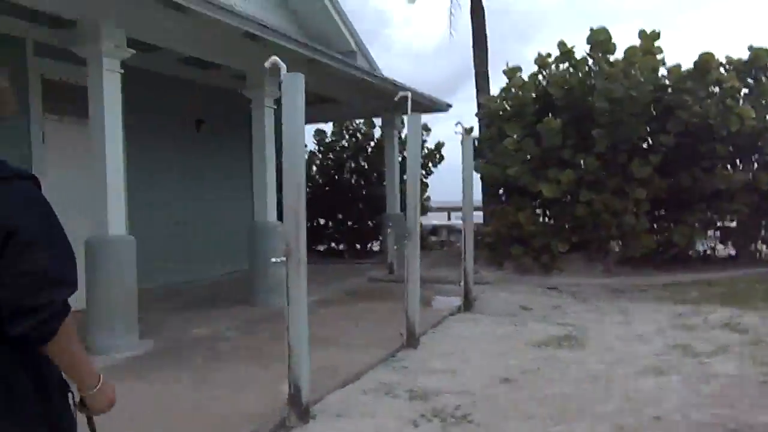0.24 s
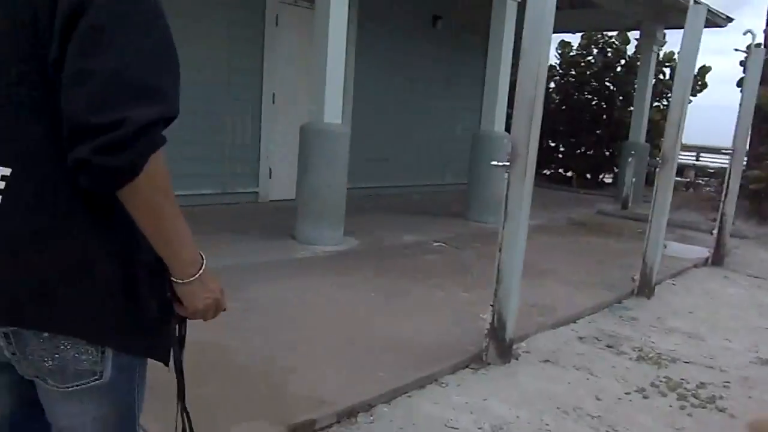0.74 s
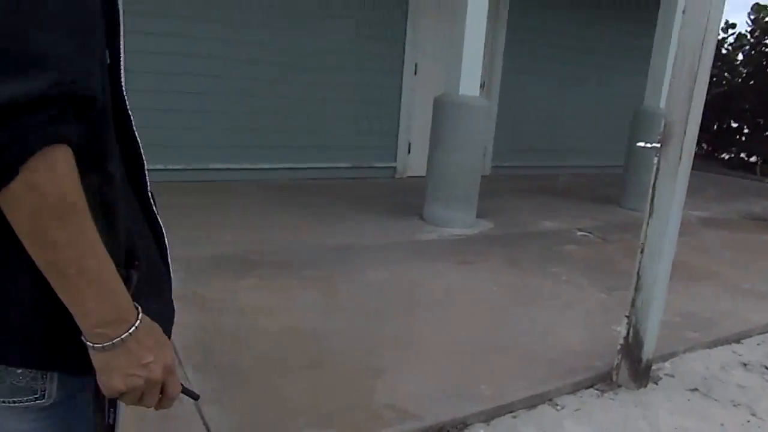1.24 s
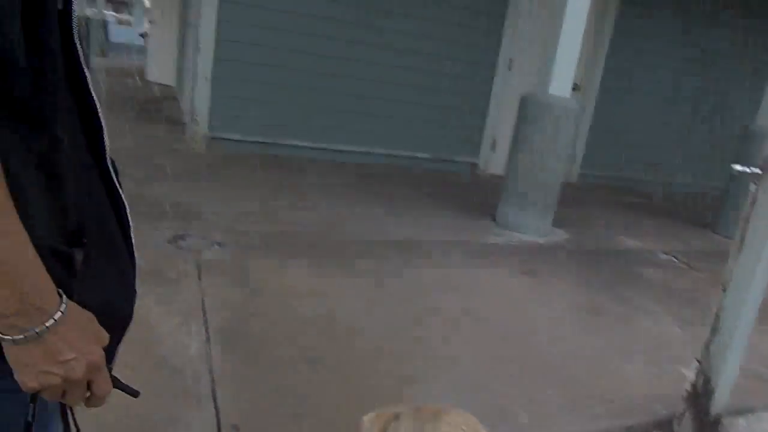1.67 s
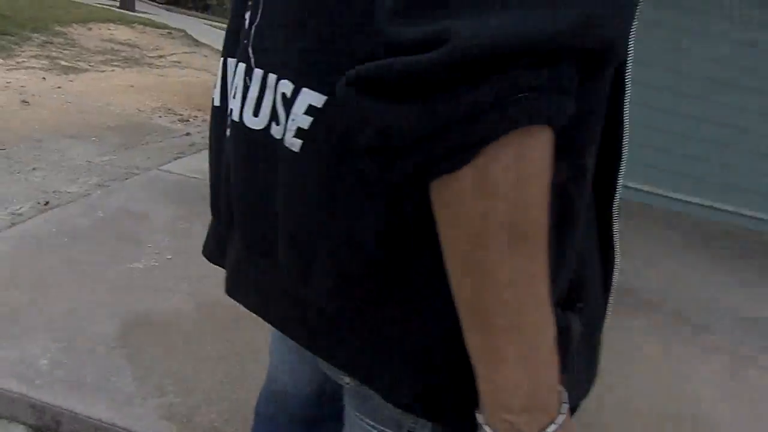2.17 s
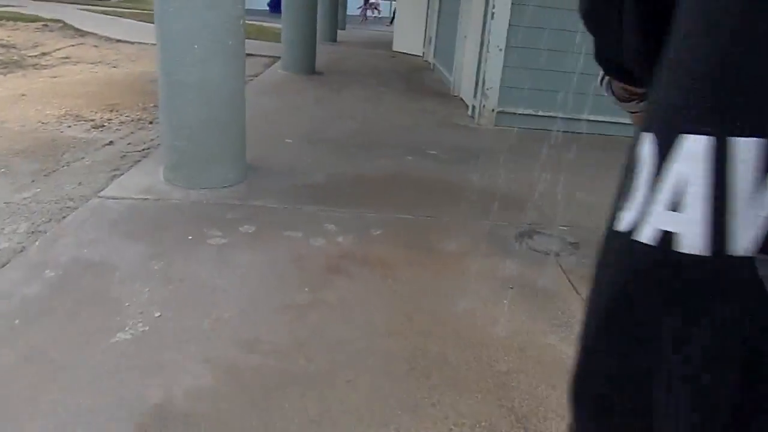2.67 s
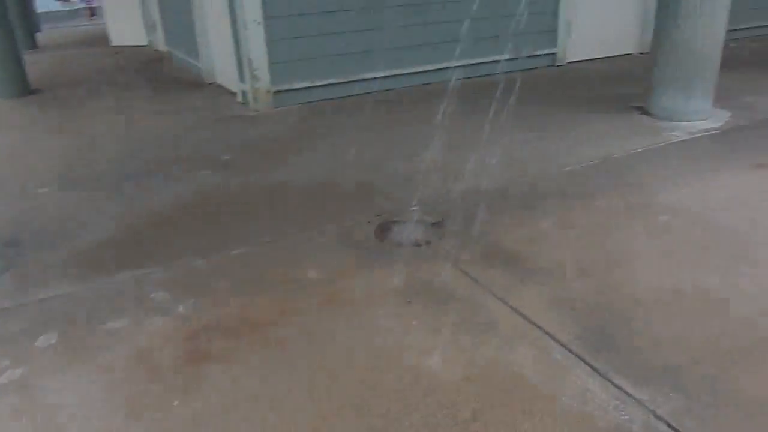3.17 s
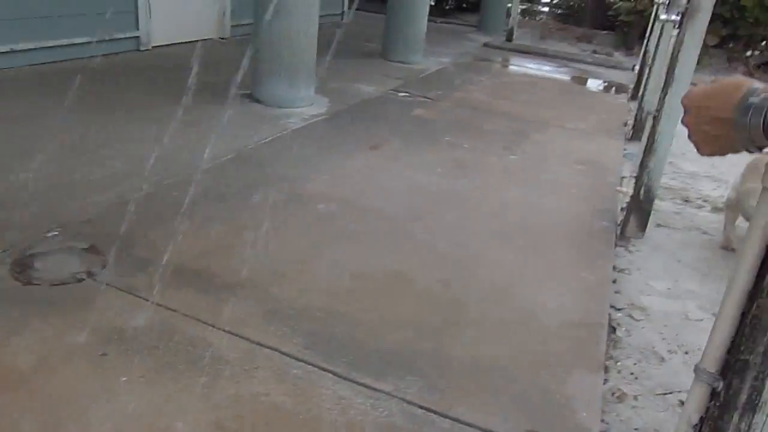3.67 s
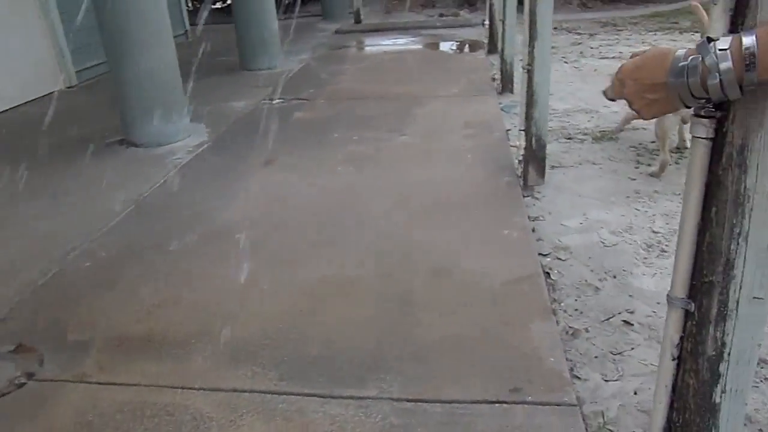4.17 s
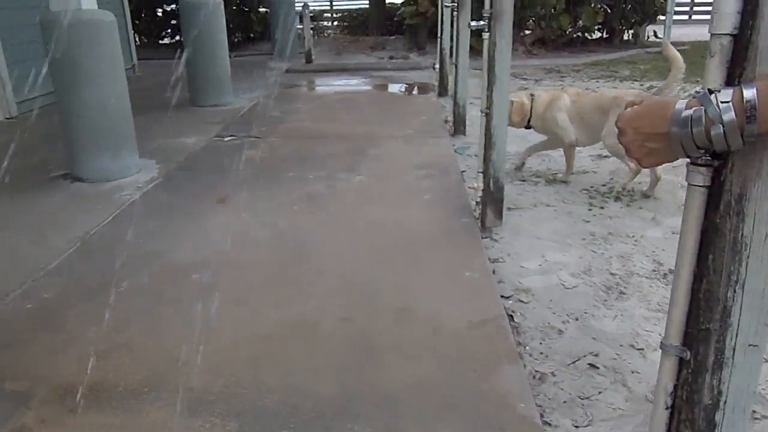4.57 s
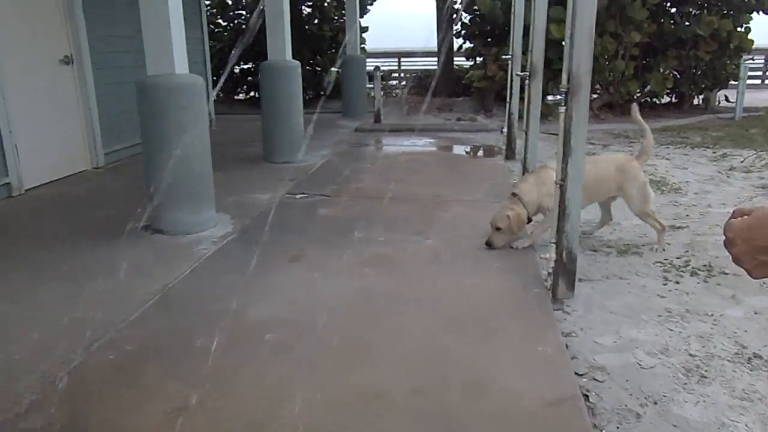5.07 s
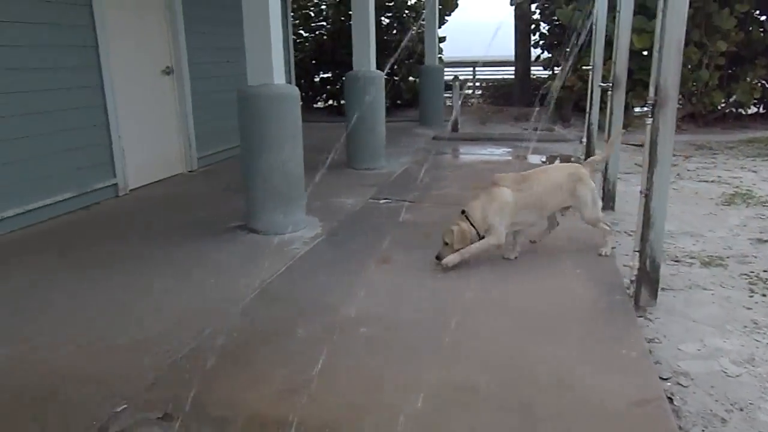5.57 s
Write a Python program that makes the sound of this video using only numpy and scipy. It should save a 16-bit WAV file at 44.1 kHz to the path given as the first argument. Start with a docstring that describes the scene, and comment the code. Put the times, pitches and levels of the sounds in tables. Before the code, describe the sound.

Outdoors by the sea, low wind and surf rumble over soft thumps and sandy scuffs, with a faint far hoot and squeak. A valve clicks and a shower spurts, then runs, hissing and cracking on concrete. The carried microphone moves under a roof, the wind dulls, the spray sags near four seconds and is pressed back on.

```python
"""A beach pavilion by the sea, heard from a camera microphone carried past an outdoor shower.
At first wind and surf rumble, feet thump and scuff over sand, a far hoot and a squeak pass; then the push
valve clicks and spurts, is pressed again and runs, its drops cracking on wet concrete over a mist of droplets.
From 2 s the microphone moves in under the roof and the wind fades and dulls in the lee of the building.
Near 3.9 s a hollow blip sounds and the spray sags, until a last press brings it back; hard ticks run throughout."""
import sys
import numpy as np
from scipy import signal
from scipy.fft import rfft, irfft, next_fast_len
from scipy.io import wavfile
from scipy.ndimage import uniform_filter1d, map_coordinates

SR = 44100
rng = np.random.default_rng(int(sys.argv[2]) if len(sys.argv) > 2 else 0)


def master_out(mix):
    """Clip the mix to full scale and print it as 16-bit PCM to the path in sys.argv[1]."""
    frames = np.transpose(np.atleast_2d(mix))
    ceiling = np.clip(frames, -1, 1)
    pcm = np.round(ceiling * 32767).astype(np.int16)
    wavfile.write(sys.argv[1], SR, pcm)


N = 256662
TIME = np.arange(N) / SR  # [s]


def amp(db):
    """Decibels to gain."""
    return 10 ** (np.asarray(db) / 20)


def unit(x):
    """Scale to rms 1."""
    return x / np.sqrt(np.mean(x ** 2) + 1e-20)


def curves(rows):
    """One value per sample for each column after the time."""
    times, *columns = np.transpose(rows)
    return [np.interp(TIME, times, column) for column in columns]


def wobble(rate):
    """A smooth random curve, rate knots a second."""
    knots = rng.standard_normal(int(N * rate / SR) + 4)
    return map_coordinates(knots, [TIME * rate])


def filtered(x, response):
    """x times a response of frequency, padded so that the end does not wrap to the start."""
    size = next_fast_len(N + SR // 4)
    spectrum = rfft(x, size) * response(np.fft.rfftfreq(size, 1 / SR))
    return irfft(spectrum, size)[:N]


def coloured(x, spectrum):
    """x shaped by (frequency [Hz], level [dB]) points, joined on a log frequency scale, at rms 1."""
    points_hz, db = np.transpose(spectrum)

    def response(hz):
        return amp(np.interp(np.log(hz + 1), np.log(points_hz + 1), db, left=-120))

    return unit(filtered(x, response))


def noise(spectrum):
    """Fresh noise of the given colour."""
    return coloured(rng.standard_normal(N), spectrum)


def swell(s, length):
    """A bell-shaped envelope around time s, down to exp(-2) one length away."""
    return np.exp(-2 * ((TIME - s) / length) ** 2)


def hump(hz, centre_hz, sharp):
    """A broad resonance, symmetrical in octaves around its centre."""
    return 1 / (1 + (sharp * np.log2((hz + 1) / centre_hz)) ** 2)


def impacts(rate, spread_db, life, clump_db):
    """Random tiny noise bursts at a steady or changing rate, each with its own size, decay and colour."""
    start = np.flatnonzero(rng.random(N) < rate / SR)
    count = len(start)
    age = np.arange(64)  # samples since each impact
    lives = life * np.exp(.5 * rng.standard_normal((count, 1)))
    burst = rng.standard_normal((count, len(age))) * np.exp(-age / SR / lives)
    burst /= np.linalg.norm(burst, axis=1, keepdims=True)
    size = amp(spread_db * np.minimum(rng.standard_normal((count, 1)), 2))  # drops only grow so big
    places = start[:, None] + age
    train = np.bincount(places.ravel(), (size * burst).ravel(), N)[:N]
    return unit(train / np.sqrt(rate) * amp(clump_db * wobble(90)))  # fewer drops are fatter


ENTER_S, ENTER_LENGTH_S = 1.98, 1.0  # when the move in under the roof starts, and how long it takes


def under_roof():
    """0 out on the sand, 1 once the camera is in the pavilion."""
    return np.clip((TIME - ENTER_S) / ENTER_LENGTH_S, 0, 1)


# strength of the wind, dropping in the lee of the building: (time [s], level [dB])
WIND = [(0.0, -34), (0.6, -32.5), (1.05, -35.5), (1.4, -33.5), (1.7, -37.5), (2.7, -39.5), (3.1, -43.5),
        (3.9, -46), (4.8, -46.5), (5.82, -43)]
# colours of the sea air, each brought to rms 1: (frequency [Hz], relative level [dB])
BUFFET = [(12, -34), (20, -8.5), (59, -8), (130, -14.5), (170, -20), (290, -120)]  # low buffeting
ROAR = [(53, -0.5), (90, -1.5), (220, 1.5), (290, -1.5), (422, -3), (520, -7.5), (690, -17.5), (800, -25.5),
        (1040, -24), (1760, -120)]  # wind out on the sand
LEE = [(41, -27), (70, 0.5), (123, -1.5), (146, 0.5), (254, -3), (291, -5.5), (613, -17.5), (741, -16.5),
       (856, -25.5), (1000, -39), (1300, -55), (2200, -120)]  # the same wind in the shelter of the wall
WASH = [(300, -7), (550, 0.5), (800, 3), (1300, -2.5), (2000, -5), (4000, -10), (9000, -16), (14000, -20)]  # surf
ROAR_DB, BUFFET_DB, WASH_DB = 0, -7, -9  # each layer against the wind's mean strength
BUFFET_GROWS, WASH_GROWS = 0.4, 1.23  # dB of swing for each dB of wind


def seaside():
    """One strength drives the buffeting, the roar round the building (duller in its lee) and the wash of surf."""
    strength_db, = curves(WIND)
    swing_db = strength_db - strength_db.mean()
    buffet = amp(BUFFET_DB + BUFFET_GROWS * swing_db + 1.4 * wobble(9)) * noise(BUFFET)
    shelter = under_roof()
    wind = np.sqrt(1 - shelter) * noise(ROAR) + np.sqrt(shelter) * noise(LEE)
    roar = amp(ROAR_DB + swing_db + 0.43 * wobble(8.5)) * wind
    wash = amp(WASH_DB + WASH_GROWS * swing_db + 0.94 * wobble(4.05)) * noise(WASH)
    return amp(strength_db.mean()) * (buffet + roar + wash)


# soft jolts of walking: (time [s], length [s], level [dB], centre [Hz])
THUMPS = [(0.008, 0.03, -25.5, 60), (0.216, 0.081, -29, 67), (0.498, 0.056, -38, 60),
          (0.603, 0.046, -33.5, 70), (2.828, 0.06, -40.5, 159), (3.19, 0.15, -43, 59)]
# scuffs on sand: (time [s], length [s], level [dB], centre [Hz])
SCUFFS = [(0.194, 0.0079, -43, 8500), (0.316, 0.084, -40.5, 1720), (0.376, 0.018, -39, 990),
          (0.38, 0.071, -44, 7840), (0.51, 0.026, -37.5, 7360), (0.599, 0.0061, -37, 2330),
          (0.63, 0.084, -45, 5970), (0.744, 0.0043, -34, 1750), (0.783, 0.037, -36.5, 2000),
          (0.914, 0.011, -35, 3300)]


def steps():
    """Walking jolts the camera in low noise thumps and grinds the sand in swells of tiny grit impacts."""
    out = np.zeros(N)
    for s, length, db, centre_hz in THUMPS:
        jolt = filtered(rng.standard_normal(N), lambda hz: hump(hz, centre_hz, 0.97) / (1 + (hz / 280) ** 4))
        out += amp(db) * swell(s, length) * unit(jolt)
    grit = impacts(rate=6000, spread_db=5, life=.0002, clump_db=1)
    for s, length, db, centre_hz in SCUFFS:
        scuff = filtered(grit, lambda hz: hump(hz, centre_hz, 1.28))
        out += amp(db) * swell(s, length) * unit(scuff)
    return out


# a far hoot, a squeak and the valve singing as it opens: (start [s], attack [s], hold [s], release [s],
# turning pitch [Hz], droop [Hz/s], level [dB], roughness of pitch [0-1])
TONES = [(0.01, 0.11, 0.15, 0.05, 653, -1, -46, 0), (0.53, 0.15, 0.074, 0.13, 1284, 800.5, -38.5, 0.03),
         (1.0, 0.01, 0.14, 0.12, 11300, 4, -44, 0.022)]
FLUTTER_DB = 1.2  # unsteadiness of those tones


def whistle(start, attack, hold, release, top_hz, droop, db, rough):
    """A thin unsteady sine; with a positive droop its pitch climbs during the attack and falls after it."""
    corners = start + np.cumsum([0, attack, hold, release])
    envelope = np.interp(TIME, corners, [0, 1, 1, 0]) ** 2
    hz = top_hz - droop * np.abs(TIME - start - attack)
    phase = 2 * np.pi * np.cumsum(hz * (1 + rough * wobble(250))) / SR
    return envelope * amp(db + FLUTTER_DB * wobble(89.2)) * np.sqrt(2) * np.sin(phase)


BLIP_S, BLIP_LENGTH_S, BLIP_DB, BLIP_HZ = 3.849, 0.019, -47, 1256


def blip():
    """A short hollow note of narrow-band noise, without a clear pitch."""
    tone = filtered(rng.standard_normal(N), lambda hz: 1 / (1 + ((hz - BLIP_HZ) / 110) ** 4))
    return amp(BLIP_DB) * swell(BLIP_S, BLIP_LENGTH_S) * unit(tone)


# hard ticks of grit, valve clicks and fat drops, each starting 1 ms after its time:
# (time [s], crack level [dB], crack centre [Hz], snap rms level [dB], clack rms level [dB])
TICKS = [(0.4107, -11, 6700, -35, -32), (0.4468, -10.5, 10400, -44, -37), (0.4901, -12, 8550, -37, -34.5),
         (0.8797, -2.5, 12100, -24, -35.5), (1.0066, -20, 11000, -54, -37), (1.7875, -9, 9390, -28.5, -40),
         (1.7982, -9, 10400, -34, -30), (2.6948, -11, 11420, -40, -41), (2.7402, -10, 10000, -31, -52),
         (2.8863, -9, 9640, -37, -49), (3.4181, -19, 9110, -36, -32.5), (3.5327, -7, 10180, -48, -49),
         (4.0652, -25, 7710, -41, -55), (4.124, -25, 9720, -41, -53), (4.276, -23.5, 5960, -39, -56),
         (4.32, -16, 9100, -35, -47), (4.343, -16, 10800, -34, -50), (4.5417, -11, 8770, -39, -56),
         (4.8633, -18, 10740, -38, -52), (5.4988, -11.5, 8920, -41, -48)]
SNAP_HZ, CLACK_HZ = 6720, 3350  # typical middle and low ring; each tick strays from them
CRACK_S, SNAP_S, CLACK_S = 0.0001, 0.00024, 0.00016  # from the start of each ring to its fullest


def ticks():
    """Each hard contact rings for a few cycles, snaps and clacks lower down and throws a brief spatter."""
    out = np.zeros(N + SR)
    t = np.arange(SR // 300) / SR

    def ring(hz, life):
        return np.sin(2 * np.pi * hz * t) * t / life * np.exp(1 - t / life)

    for s, db, hz, snap_db, clack_db in TICKS:
        spatter = .17 * rng.standard_normal(len(t)) * np.exp(-t / .001)
        crack = ring(hz, CRACK_S) + spatter
        snap = unit(ring(SNAP_HZ * np.exp(rng.normal(0, .06)), SNAP_S))
        clack = unit(ring(CLACK_HZ * np.exp(rng.normal(0, 0.13)), CLACK_S))
        first = round((s + .001) * SR)
        out[first:][:len(t)] += amp(db) * crack + amp(snap_db) * snap + amp(clack_db) * clack
    return filtered(out[:N], lambda hz: (hz / np.hypot(hz, 1100)) ** 2)  # takes off the lows


# presses of the self-closing valve: (opens [s], depth [0-1], rise time [s], shut [s],
# length of the sag before it shuts [s])
PRESSES = [(0.778, 0.72, 0.095, 1.01, 0.1), (1.003, 0.8, 0.093, 4.32, 0.48), (4.272, 1, 0.028, 7.5, 0.4)]
KICK, LEAK = 0.32, 0.08  # share of flow at the push, share of pressure left when shut
CHOKE_S, CHOKE_DB = 0.02, -9  # the water is pinched off just before each push


def valve():
    """Flow and pressure, 0-1: each press lets a kick of water through, fills up, then sags until it shuts."""
    flow, pressure = np.zeros(N), np.ones(N)
    for opens, depth, rise, shut, sag in PRESSES:
        pressed = TIME >= opens
        filling = 1 - (1 - KICK) * np.exp(-np.maximum(TIME - opens, 0) / rise)
        pressure = np.where(pressed, np.clip((shut - TIME) / sag, LEAK, 1), pressure)
        choked = flow * amp(CHOKE_DB * swell(opens, CHOKE_S))
        flow = np.where(pressed, depth * filling * pressure, choked)
    return np.clip(flow, 0, 1), pressure


def patchy(x, depth_db):
    """The colour shifts from moment to moment: a smoothed random gain over frequency and time."""
    z = signal.stft(x, nperseg=512)[2]
    field = uniform_filter1d(rng.standard_normal(z.shape), size=7, axis=0)
    field = uniform_filter1d(field, size=9, axis=1)
    return signal.istft(z * amp(depth_db * unit(field)), nperseg=512)[1][:N]


# spray at full flow, as the camera moves and a walker screens it:
# (time [s], fine fizz level [dB], splatter level [dB])
SPRAY = [(1.15, -28.5, -36), (1.57, -26, -35.3), (1.95, -31, -41), (2.18, -35.5, -46.5), (2.38, -34.5, -48),
         (2.52, -31, -41), (2.7, -24.5, -39), (2.96, -31, -43), (3.65, -30, -41.5), (4.6, -37, -46),
         (5.82, -34, -42)]
# colour of water on wet concrete, brought to rms 1: (frequency [Hz], relative level [dB])
SPLASH = [(880, -52), (1500, -24), (2400, -18.5), (3200, -10.5), (4100, -8.5), (5000, -4.5), (6450, -3),
          (8000, -0.5), (10000, 1), (12300, 0.5), (14000, -3)]
DROPS_PER_S = 1050  # at full pressure
# drops over mist: from outside, under the roof, extra as pressure dies
DROPS_FAR_DB, DROPS_NEAR_DB, DRIBBLE_DB = -0.5, 3.5, 12
FIZZ_POWER, SPLATTER_POWER = 0.88, 0.75  # loudness against flow: a weak jet loses its fine fizz first
SPLATTER_FLUTTER_DB, SPLATTER_FLUTTER_PER_S = 1.0, 30  # fat drops land in uneven clumps


def shower():
    """Separate drops crack on wet concrete over a mist of droplets; low pressure gives fewer, plainer drops."""
    fizz_db, splatter_db = curves(SPRAY)
    splatter_db = splatter_db + SPLATTER_FLUTTER_DB * wobble(SPLATTER_FLUTTER_PER_S)
    flow, pressure = valve()
    nearness_db = (DROPS_NEAR_DB - DROPS_FAR_DB) * under_roof()
    drops_gain = amp(DROPS_FAR_DB + nearness_db + DRIBBLE_DB * (1 - pressure))
    drops = impacts(rate=DROPS_PER_S * pressure ** 0.8, spread_db=6.5, life=0.00019, clump_db=-1.0)
    # each drop throws up droplets that patter down just after it, dying away over 2 ms
    recent_power = signal.lfilter([1], [1, -np.exp(-1 / (.002 * SR))], drops ** 2)
    thrown = unit(np.sqrt(recent_power))
    mist = unit(rng.standard_normal(N) * (1 + 0.19 * thrown))
    mix = (drops_gain * drops + mist) / np.hypot(1, drops_gain)
    water = coloured(patchy(mix, depth_db=1.0), SPLASH) * amp(0.43 * wobble(28))
    fizz = filtered(water, lambda hz: 1 - 1 / (1 + (hz / 6500) ** 6))  # the part above about 6.5 kHz
    splatter = water - fizz
    fizz_gain = flow ** FIZZ_POWER * amp(fizz_db)
    splatter_gain = flow ** SPLATTER_POWER * amp(splatter_db)
    return fizz_gain * unit(fizz) + splatter_gain * unit(splatter)


def pavilion(x, t60):
    """The short answer of wall and roof: decaying noise that begins 6 ms after the direct sound."""
    t = np.arange(SR // 2) / SR
    tail = rng.standard_normal(len(t)) * amp(-60 * t / t60) * (t > .006)
    return signal.fftconvolve(x, tail / np.linalg.norm(tail))[:N]


def scene():
    """Water, ticks, blip and thin tones with the pavilion's answer, and steps and sea air around, in mono."""
    near = shower() + ticks() + blip() + sum(whistle(*tone) for tone in TONES)
    echo = amp(-10.5) * pavilion(near, t60=0.47)
    return (near + echo + steps() + seaside())[None]


TOP_HZ = 14100


def record(dry):
    """The camera microphone keeps almost nothing above its band limit."""
    return filtered(dry[0], lambda hz: 1 / np.hypot(1, (hz / TOP_HZ) ** 160))[None]


dry = scene()
out = record(dry)
master_out(out)
```